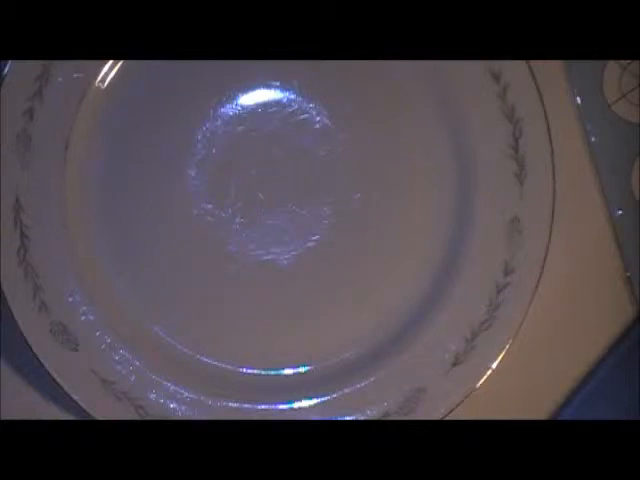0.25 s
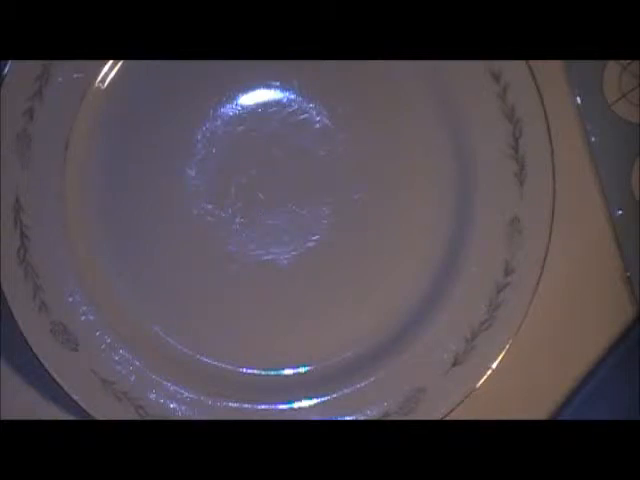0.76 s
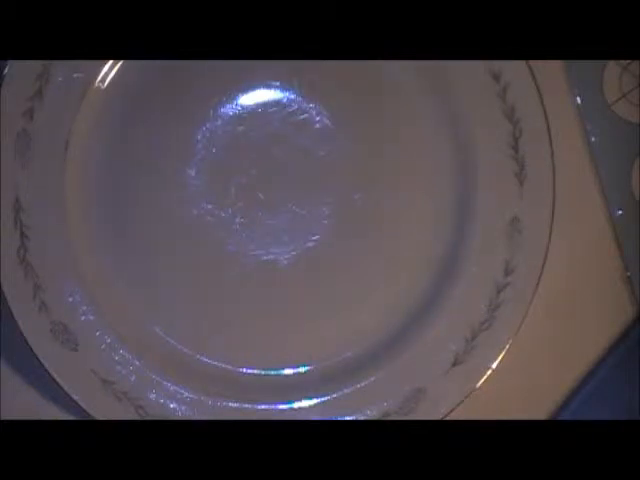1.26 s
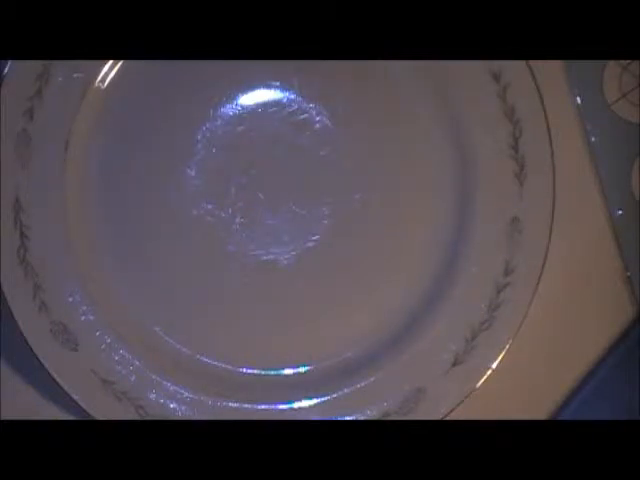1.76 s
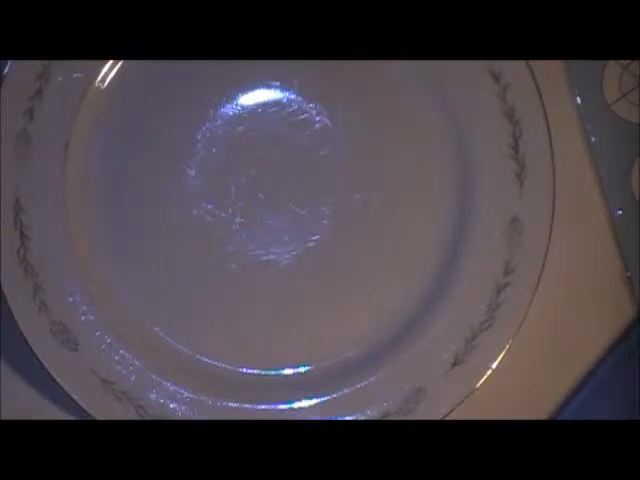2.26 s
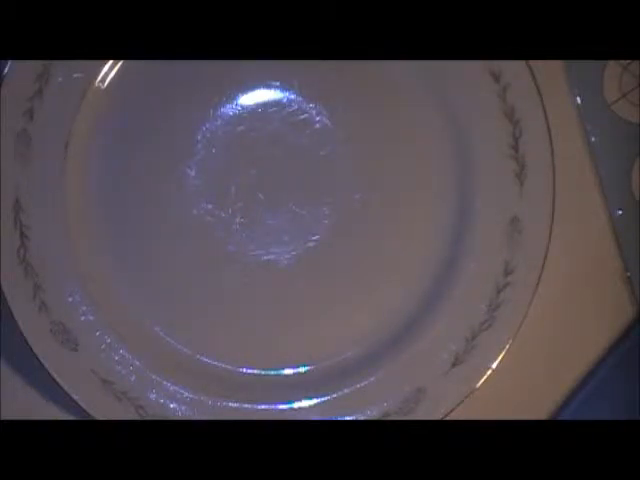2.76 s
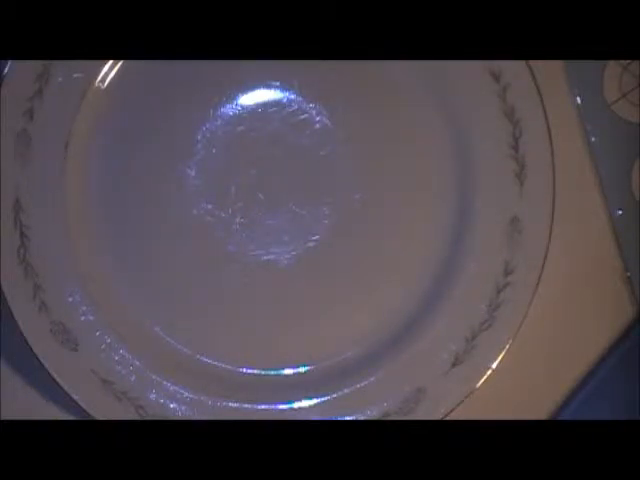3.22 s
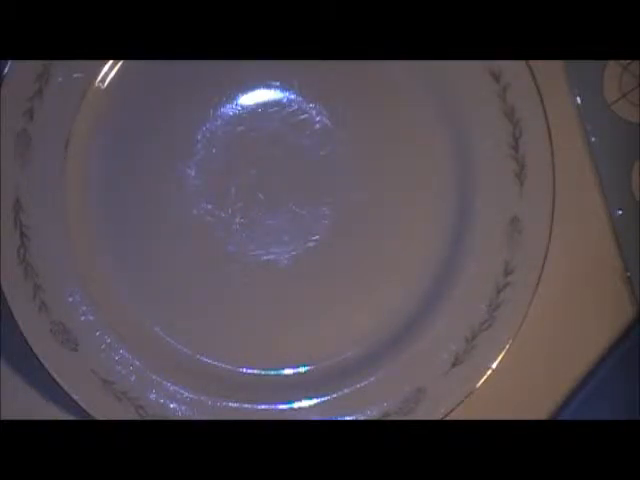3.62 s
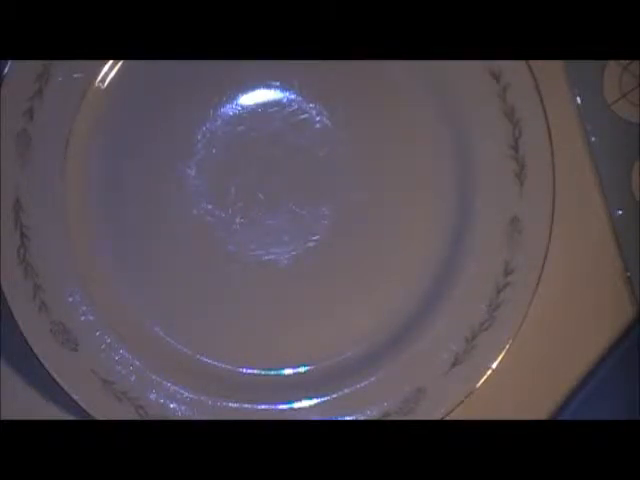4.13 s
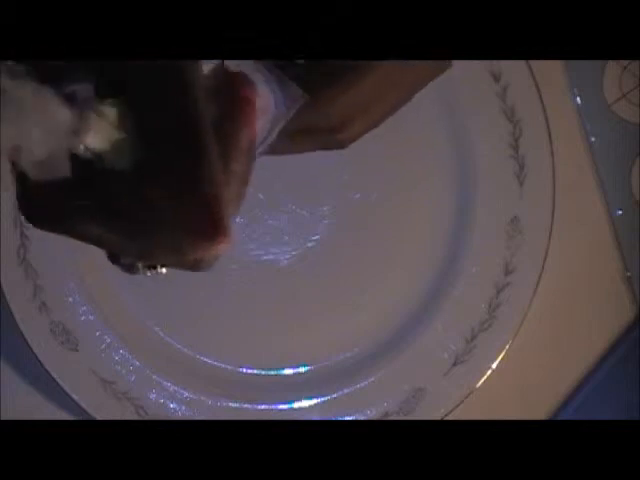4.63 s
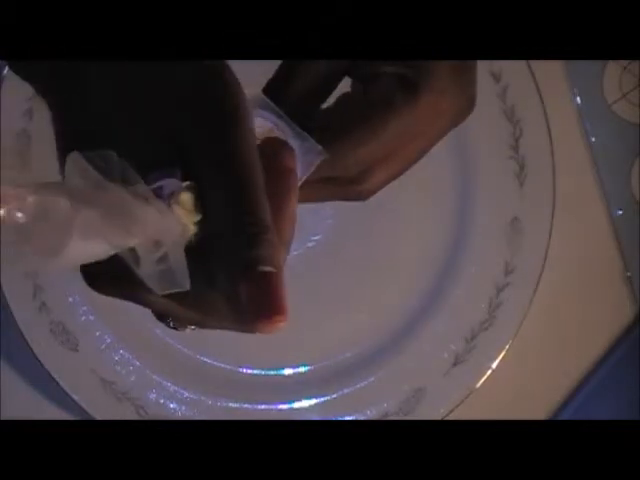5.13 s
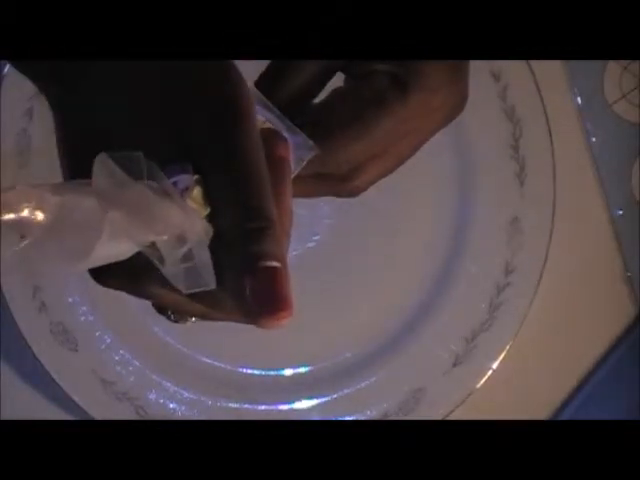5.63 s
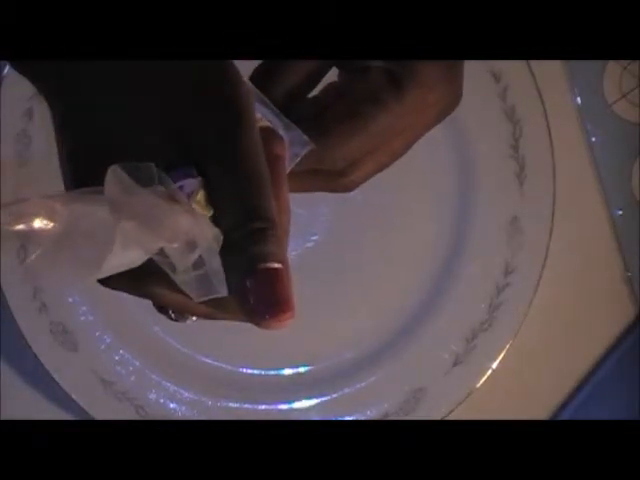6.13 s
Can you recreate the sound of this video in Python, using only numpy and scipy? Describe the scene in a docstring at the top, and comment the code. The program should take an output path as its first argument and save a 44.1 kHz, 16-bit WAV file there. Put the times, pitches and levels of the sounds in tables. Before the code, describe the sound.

Quiet room tone opens: soft air noise, a faint wavering electric buzz and a barely audible high whistle, slightly heavier on the right. Around 0.9 seconds fingers rub dully on thin plastic, again at 1.3 and 1.5. From 1.5 to 1.9 creases crackle in a dense burst, with a short pitched film ring near 1.8, a very sharp snap at 1.86 and a tiny low table thud. Rubbing and rustling continue with small ticks, then a bright hard click at 2.46. At 2.75 a broad crisp swish and several snaps come together. Handling thins out; one fuller pop lands at 3.6. Near 3.9 to 4.1 a soft hand knock meets little bright swishes and a click. A faint rub around 4.5, a tick at 4.65 and a very faint one at 4.96 end the activity, leaving the hum until about 6.3. Short hard reflections surround the nearby bag.

```python
"""A thin plastic piping bag is gripped and twisted over a table, an arm's length from two small microphone ports.
Its creases snap in bursts of tiny slips, the film swishes or rings as filtered grit, fingers slide as uneven noise.
A hand knocks the table softly, as fading sine tones. A small hard room adds quick echoes and a short noise tail.
Behind it lie air noise, an electric buzz of wavering sines on multiples of about 120 Hz, and a thin high whistle."""
import sys
import numpy as np
from scipy import signal
from scipy.fft import rfft, irfft
from scipy.io import wavfile
from scipy.ndimage import uniform_filter1d

SR = 44100
rng = np.random.default_rng(int(sys.argv[2]) if len(sys.argv) > 2 else 0)


def wrap_up_sound(samples):
    """Save the sound to the file named by the first command line argument, as 16-bit audio."""
    columns = np.atleast_2d(samples).T
    # keep every value between -1 and 1, then stretch to whole-number steps
    tamed = np.clip(columns, -1, 1)
    steps = np.round(tamed * 32767).astype(np.int16)
    wavfile.write(sys.argv[1], SR, steps)


def to_linear_factor(level_db):
    """Convert decibel levels (scalar or array-like) to linear amplitude factors."""
    exponent = np.asarray(level_db, float) / 20
    return 10 ** exponent


N = 281358  # length in samples

# Colour of the room's air noise. Each row: pitch in Hz, relative level in dB per Hz.
AIR_COLOUR = [(20, -47.5), (35, -23), (90, -16), (140, -6), (220, -2.5), (450, -2), (800, -1), (1050, -3.5),
              (1300, -6.5), (2500, -13), (4200, -18), (6000, -21), (8000, -23), (11500, -25.5),
              (14000, -30.5), (16500, -45)]
# How alike the air noise is left and right. Each row: pitch in Hz, likeness (0 unrelated, 1 the same).
AIR_LIKENESS = [(40, .8), (130, 0.11), (300, 0), (3000, 0), (7000, 0.057), (15000, 0)]
# Buzz tones that stand out. Each row: multiple of the buzz pitch, rms level in dB before wavering.
BUZZ_TONES = [(1, -78), (2, -87.5), (3, -82), (5, -72.5), (6, -74), (7, -71.5), (8, -82.5), (9, -72.5),
              (12, -81.5), (13, -86), (18, -83.5), (30, -82.5), (45, -83.5), (49, -81.5), (51, -79.5),
              (54, -84), (61, -91), (77, -85), (96, -91)]
# The other buzz tones in this range. Each row: pitch in Hz, rms level in dB before scatter and wavering.
FAINT_BUZZ_TONES = [(3600, -93), (6000, -93), (8700, -98)]
# A hand sets down on the table. Each row: start in seconds, peak level in dB, pitch in Hz,
# time to fall by 60 dB in seconds.
HAND_THUDS = [(1.859, -49, 40.5, 0.028), (3.927, -48, 342, 0.049), (3.948, -64.5, 150, .08)]
# Strokes of the fingers along the film. Each row: time of firmest grip in seconds, rise in ms, fall in ms,
# level of the dull rub in dB, level of the rustle in dB over the rub.
FINGER_STROKES = [(0.9, 34, 23, -60, -14), (0.991, 43, 45, -58, 1.5), (1.27, 62, 430, -59.5, -6),
                  (1.487, 4.5, 47, -54, 0), (1.6, 70, 74, -62, -1), (1.69, 88, 80, -58.5, -7),
                  (1.95, 150, 160, -61.5, -0.5), (2.22, 88, 160, -65, -2), (2.415, 77, 160, -64, 2.5),
                  (2.735, 42, 130, -65, 7.5), (3.02, 65, 100, -69, 3), (3.2, 110, 96, -64, -0.5),
                  (3.5, 185, 75, -69.5, 4), (3.65, 80, 220, -66, -4.5), (3.97, 41, 200, -81, 14),
                  (4.48, 210, 130, -63, -5), (4.7, 100, 200, -78, -2.5)]
# Colour of skin rubbing. Each row: pitch in Hz, relative level in dB per Hz.
RUB_COLOUR = [(200, -28), (350, -3), (900, -0.5), (1800, -3), (3200, -9.5), (6000, -26.5), (10000, -46.5)]
# Colour of film rustling. Each row: pitch in Hz, relative level in dB per Hz.
RUSTLE_COLOUR = [(1500, -21.5), (3500, -3), (6000, -4), (8500, 1), (11000, -5), (13000, -12.5),
                 (16000, -39)]
# Quick swishes and short pitched rings of the film. Each row: start in seconds, length in ms,
# level in dB before the bag's colour, centre pitch in Hz, width in Hz.
FILM_SWISHES = [(1.482, 28, -61, 1380, 690), (1.794, 36, -44.5, 2120, 199.2), (1.865, 73, -53.5, 1900, 250),
                (2.754, 35, -43.5, 8600, 3000), (2.752, 43, -46, 3420, 2480), (2.755, 41, -55, 890, 900),
                (3.997, 13.4, -53.5, 4240, 1800), (4.008, 18, -57, 4400, 2400),
                (4.032, 28, -51.5, 8900, 4030), (4.041, 25, -53, 4040, 700), (4.100, 21, -55.5, 7760, 3000)]
# Creases that buckle. Each row: start in seconds, level in dB at 2-5 kHz, ring pitch in Hz,
# relative edge in dB above 5 kHz, buckling time in ms.
CREASE_SNAPS = [(1.481, -59.5, 7700, 9, 1), (1.57, -51.5, 1280, 5, 1.9), (1.6159, -50, 1300, -6, 1.8),
                (1.6307, -42.5, 2350, -2.5, 1.3), (1.635, -55, 3140, -0.5, 2.7),
                (1.6513, -53, 7505, 10, 0.4), (1.663, -48, 1170, -4.5, 2.9), (1.6703, -52, 3320, -0.5, 1.2),
                (1.7087, -57, 1000, -14.5, 0.76), (1.7186, -44, 2020, -2.5, 0.4),
                (1.724, -48.5, 2180, -11, 0.88), (1.7882, -42, 5650, 6, 0.74),
                (1.7901, -32.5, 2130, 0.5, 1.4), (1.7932, -36, 7410, 1.5, 1),
                (1.8255, -53.5, 736, -10.5, 3), (1.861, -25.5, 7980, 1, 0.2), (1.892, -38.5, 5770, 3, 0.7),
                (1.997, -44.5, 3934, 6, 0.68), (2.098, -56.5, 2180, -13, 0.92),
                (2.186, -56.5, 1470, -13, 1.2), (2.3688, -58, 5900, 6, 1), (2.3935, -54.5, 1200, 4, 0.44),
                (2.435, -48, 6000, 8.0, 0.96), (2.4568, -31, 6840, 11, 1.57),
                (2.7476, -49, 8100, 6.5, 0.45), (2.7503, -43, 8000, 0.5, 0.9), (2.7957, -45, 7700, 5, 0.6),
                (2.8782, -62, 6030, 5, 0.3), (2.8895, -45.5, 6230, -2.5, 1.7), (2.952, -56, 1240, -11, 2),
                (3.158, -54, 1820, 0, 3), (3.5974, -35.0, 2960, -0.5, 1.9), (3.922, -60, 5300, 4.0, 0.33),
                (3.926, -63, 7670, 11, 0.5), (4.056, -45.5, 4020, -4, 2), (4.6519, -44, 1530, -6.5, 2.3),
                (4.9581, -62, 3500, 0, 2)]
# A large patch of film rings low and carries more body. Each row: ring pitch in Hz,
# relative body in dB below 2 kHz.
PATCH_BODY = [(900, 8.5), (1250, 2), (1500, -6), (2200, -6.5), (4000, -21), (5500, -11.5), (7500, -6.5)]
# Colour of the bag's snaps and swishes as picked up: weak bass, and a microphone that rolls off above 11 kHz.
# Each row: pitch in Hz, gain in dB.
BAG_COLOUR = [(100, -35), (300, -8.5), (600, 4), (10500, 3), (12000, -8), (14000, -14.5), (17000, -36.5)]
# Hard echoes off the table top, then the facing walls. Each row: delay in ms, level in dB.
ECHOES = [(.4, -21), (1.0, -15), (1.6, -20), (5.6, -11), (11.0, -18.5), (16.5, -27.5)]
# The room's tail. Each row: pitch in Hz, time to fall by 60 dB in seconds, relative level in dB.
TAIL_BANDS = [(399, 0.22, -2.5), (800, 0.26, 2), (1600, 0.27, 3.5), (3200, 0.4, -1), (6320, 0.29, 2),
              (9500, 0.29, -4), (14150, 0.24, -2.5)]
# How early the left port hears the bag, compared with the right. Each row: pitch in Hz, lead in radians.
LEFT_LEAD = [(500, 0), (4000, 0.57), (8500, 0.072), (10200, 1.4), (11500, 0.3)]

AIR_DB, LEAN_RIGHT_DB = -59.5, 1.5  # air level; how much louder the background is on the right
BUZZ_HZ, FAINT_SCATTER_DB = 120.05, 2
WHISTLE_HZ, WHISTLE_DB = 15735, -89.5
LET_GO_MS = 10  # a swish or ring swells, then the film slips free in this time
PATCHY_DB, PATCH_HZ = 2.5, 600  # crumpled film favours some pitches at random, at points this far apart
TAIL_DB, TAIL_LIKENESS = -6, 0.78  # tail level; how alike it is left and right


def on_log(points, hz):
    """Read a (Hz, value) table on a log-frequency axis."""
    f, v = np.transpose(points)
    return np.interp(np.log(np.maximum(hz, 1)), np.log(f), v)


def shape(x, gain):
    """Filter the last axis by a gain that is a function of Hz."""
    size = x.shape[-1]
    hz = np.arange(size // 2 + 1) * SR / size
    return irfft(rfft(x) * gain(hz), size)


def unit(x):
    """Scale to rms 1."""
    return x / np.sqrt(np.mean(x ** 2))


def band(x, lo_hz, hi_hz, order=2):
    """Keep only the pitches between two limits, without looking ahead in time."""
    return signal.sosfilt(signal.butter(order, [lo_hz, hi_hz], "band", fs=SR, output="sos"), x)


def add(track, s, sound):
    """Mix a sound into the track from time s."""
    i = int(s * SR)
    track[i:i + len(sound)] += sound[:len(track) - i]


def walk(rate):
    """Random levels, held for 1 / rate seconds and smoothed twice; spread near 1."""
    k = int(SR / rate)
    held = np.repeat(rng.standard_normal(N // k + 1), k)
    smooth = uniform_filter1d(uniform_filter1d(held, k), k)
    return 1.26 * smooth[:N]


def grit(size, spread_db):
    """Dense tiny slips of uneven size."""
    sizes = to_linear_factor(spread_db * rng.exponential(size=size))
    return unit(rng.standard_normal(size) * sizes)


def causal(db):
    """Turn gains in dB on FFT bins into a response that reacts as early as it can (minimum phase)."""
    ceps = irfft(db * np.log(10) / 20)
    ceps[1:len(ceps) // 2] *= 2
    ceps[len(ceps) // 2 + 1:] = 0
    return np.exp(rfft(ceps))


def air():
    """Room tone: noise whose deep bass is alike in both ports and whose middle is unrelated."""
    mid, side = rng.standard_normal((2, N))
    mid = shape(mid, lambda hz: to_linear_factor(on_log(AIR_COLOUR, hz)) * np.sqrt(1 + on_log(AIR_LIKENESS, hz)))
    side = shape(side, lambda hz: to_linear_factor(on_log(AIR_COLOUR, hz)) * np.sqrt(1 - on_log(AIR_LIKENESS, hz)))
    level = to_linear_factor(AIR_DB + 0.76 * walk(2.25))
    return level * unit(np.array([mid + side, mid - side]))


def partials():
    """List (Hz, dB) of every tone: strong multiples, the whistle, faint scattered multiples."""
    strong = {round(k): db for k, db in BUZZ_TONES}
    tones = [(k * BUZZ_HZ, db) for k, db in strong.items()]
    tones.append((WHISTLE_HZ, WHISTLE_DB))
    scatter = FAINT_SCATTER_DB * rng.standard_normal(128)
    for k in range(128):
        hz = k * BUZZ_HZ
        if k not in strong and FAINT_BUZZ_TONES[0][0] < hz < FAINT_BUZZ_TONES[-1][0]:
            tones.append((hz, on_log(FAINT_BUZZ_TONES, hz) + scatter[k]))
    return tones


def buzz(side_db=-5.0, waver_db=1.5, turn=.4, steady_hz=200, whistle_hz=13000):
    """Sines waver in level and phase and differ between ports; the lowest and the whistle do so much less."""
    out, t = np.zeros((2, N)), np.arange(N) / SR
    sides = np.array([[1], [-1]])
    for hz, db in partials():
        start, skew = rng.uniform(0, 2 * np.pi, 2)
        loose = 1 if steady_hz < hz < whistle_hz else .2
        phase = start + loose * turn * walk(6) + 2 * np.pi * hz * t  # turn is in radians
        tone = np.sin(phase) + loose * to_linear_factor(side_db) * np.sin(phase + skew) * sides
        level = to_linear_factor(db + loose * waver_db * walk(2.99))
        out += np.sqrt(2) * level * tone  # a sine of rms 1 peaks at root 2
    return out


def thuds():
    """Short damped knocks of the table top: sines that die away."""
    out, t = np.zeros(N), np.arange(SR // 5) / SR
    for s, db, hz, t60 in HAND_THUDS:
        add(out, s, to_linear_factor(db - 60 * t / t60) * np.sin(2 * np.pi * hz * t))
    return out


def slide():
    """Skin rubs dully, the film rustles brightly; both are grainy, uneven and follow the grip."""
    t_ms = np.arange(N) * 1000 / SR
    rub_power, rustle_power = np.zeros((2, N))
    for s, rise_ms, fall_ms, db, bright_db in FINGER_STROKES:
        late = t_ms - 1000 * s
        grip = np.exp(-(late / np.where(late < 0, rise_ms, fall_ms)) ** 2)
        rub_power += to_linear_factor(2 * db) * grip ** 2
        rustle_power += to_linear_factor(2 * (db + bright_db)) * grip ** 2
    out = np.zeros(N)
    for power, colour in ((rub_power, RUB_COLOUR), (rustle_power, RUSTLE_COLOUR)):
        noise = unit(shape(grit(N, 1.1), lambda hz: to_linear_factor(on_log(colour, hz))))
        unevenness = to_linear_factor(1.7 * walk(40))
        out += noise * np.sqrt(power) * unevenness
    return out


def swishes():
    """Quick swishes and short pitched rings of the film: a swell of grit in one resonance, narrow or broad."""
    out = np.zeros(N)
    for s, ms, db, hz, width in FILM_SWISHES:
        way = np.linspace(0, 1, int(ms * SR / 1000))
        swell = np.sin(np.pi / 2 * np.interp(way, [0, 1 - LET_GO_MS / ms, 1], [0, 1, 0]))
        hiss = unit(band(grit(4096, 2.0), hz - width / 2, hz + width / 2, order=1))
        add(out, s, to_linear_factor(db) * swell * hiss[:len(way)])
    return shape(out, lambda hz: to_linear_factor(on_log(BAG_COLOUR, hz)))


def snaps(ring_db=6.0, ring_width=0.13, overtone_share=0.83, first_slip=.15):
    """Each crease gives way in a broad burst of slips that rings the film around it, overtones included."""
    out, size = np.zeros(N), 1024
    t_ms = np.arange(size) * 1000 / SR
    hz = np.arange(size // 2 + 1) * SR / size
    middle = (hz > 2000) & (hz < 5000)
    for s, db, ring_hz, edge_db, ms in CREASE_SNAPS:
        slips = rng.standard_normal(size)
        slips[0] = -first_slip / ms ** 2  # a quick crease lets go in one sharp step, a slow one stutters
        for _ in range(2):  # a burst that is short and yet holds every pitch evenly
            bins = rfft(slips * np.exp(-(t_ms / ms) ** 3))
            bins /= np.abs(bins) + 1e-9
            slips = irfft(bins)
        # body and edge are levels of whole bands: spread them over their widths
        body_db = on_log(PATCH_BODY, ring_hz)
        low = [(500, body_db - 4), (1300, body_db + 2.5)]
        colour = on_log(low + [(2400, 0.0029), (3800, 0.0055), (6800, edge_db - 3.5)], hz)
        # each overtone is a bump, its width given as a share of the ring pitch
        nearest = np.maximum(np.round(hz / ring_hz), 1)
        bump = np.exp(-.5 * ((hz / ring_hz - nearest) / ring_width) ** 2)
        ring = ring_db * overtone_share ** (nearest - 1) * bump
        lump_db = PATCHY_DB * rng.standard_normal(int(SR / 2 / PATCH_HZ) + 1)
        patchy = np.interp(hz / PATCH_HZ, np.arange(len(lump_db)), lump_db)
        bins = bins * causal(colour + ring + patchy + on_log(BAG_COLOUR, hz))
        energy = 2 * np.sum(np.abs(bins[middle]) ** 2) / size
        level = to_linear_factor(db) * np.sqrt(SR / 250 / energy)  # level of the energy spread over 4 ms
        add(out, s, level * irfft(bins)[:size // 2])
    return out


def room(x):
    """Direct sound, a few hard echoes, then a diffuse noise tail whose pitches fade at their own pace."""
    size = SR // 2
    t = np.arange(size) / SR
    shared, left, right = rng.standard_normal((3, size))
    noise = np.sqrt(TAIL_LIKENESS) * shared + np.sqrt(1 - TAIL_LIKENESS) * np.array([left, right])
    tail = np.zeros((2, size))
    for k, (_, t60, db) in enumerate(TAIL_BANDS):
        share = [(row[0], float(j == k)) for j, row in enumerate(TAIL_BANDS)]  # neighbouring bands cross-fade
        tail += shape(noise, lambda hz: on_log(share, hz)) * to_linear_factor(db - 60 * t / t60)
    tail *= 1 - np.exp(-t / 0.00063)  # the reflections build up
    reply = to_linear_factor(TAIL_DB) * tail / np.sqrt(np.mean(np.sum(tail ** 2, axis=1)))
    reply[:, 0] += 1  # the direct sound
    for k, (ms, db) in enumerate(ECHOES):
        at = int(ms * SR / 1000)
        reply[0, at] += to_linear_factor(db)
        reply[1, at + 2 * (-1) ** k] += to_linear_factor(db)  # echoes come from alternate sides
    return signal.fftconvolve(x[None], reply, axes=1)[:, :N]


def scene():
    """The bag and hand in the room, over the floor of air and buzz, which leans to the right."""
    sides = np.array([[1], [-1]])
    bag = room(snaps() + swishes() + slide() + thuds())
    bag = shape(bag, lambda hz: np.exp(.5j * sides * on_log(LEFT_LEAD, hz)))
    background = air() + buzz()
    return bag + to_linear_factor(-sides * LEAN_RIGHT_DB / 2) * background


def band_limit(x):
    """A steep low-pass at the top of the band."""
    return signal.sosfilt(signal.butter(12, 16790, fs=SR, output="sos"), x)


def record(dry):
    """The left port is a little brighter than the right."""
    sides = np.array([[1], [-1]])
    tilt = [(4000, 0.02), (9000, 0.51)]  # Hz, dB up on the left and down on the right
    tilted = shape(dry, lambda hz: to_linear_factor(sides * on_log(tilt, hz)))
    return band_limit(tilted)


dry = scene()
out = record(dry)
wrap_up_sound(out)
```